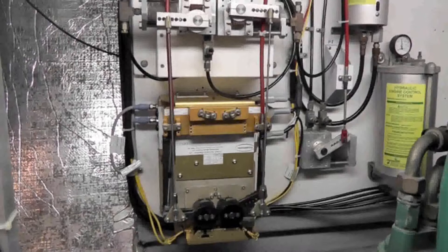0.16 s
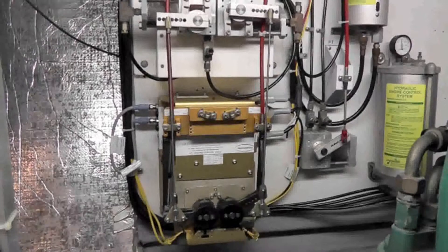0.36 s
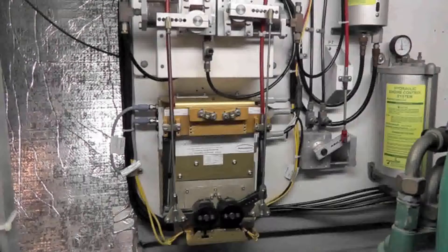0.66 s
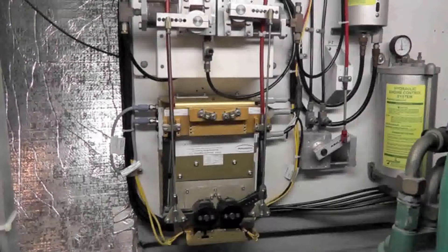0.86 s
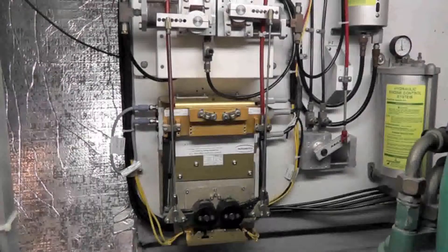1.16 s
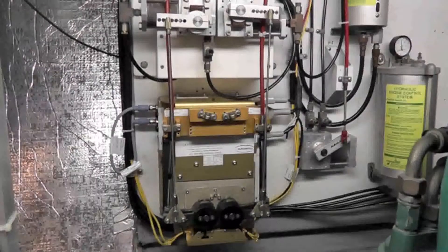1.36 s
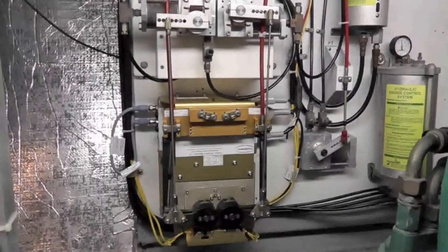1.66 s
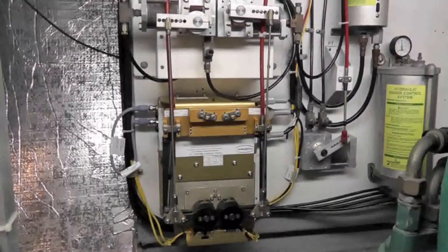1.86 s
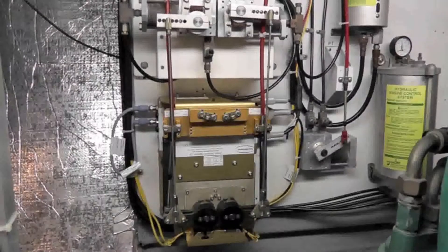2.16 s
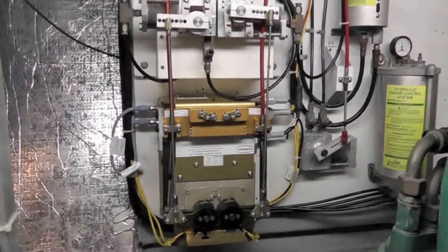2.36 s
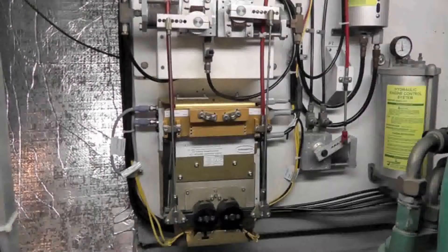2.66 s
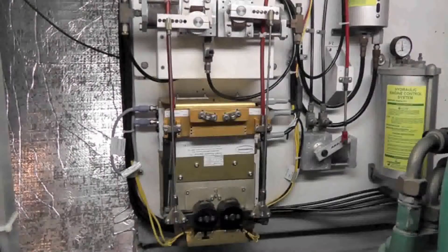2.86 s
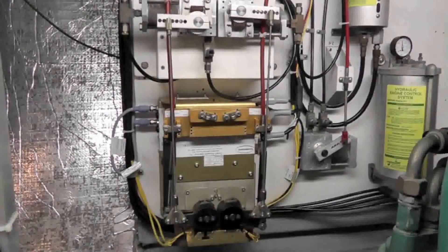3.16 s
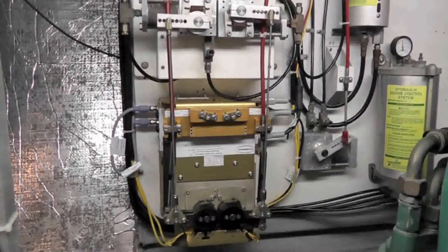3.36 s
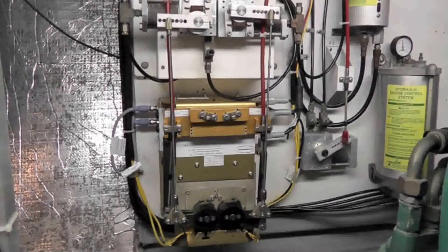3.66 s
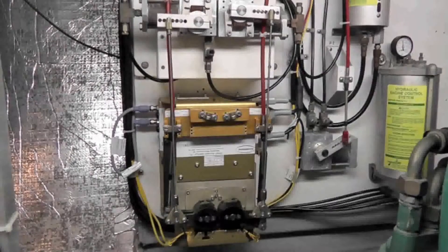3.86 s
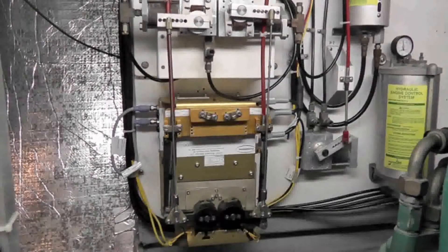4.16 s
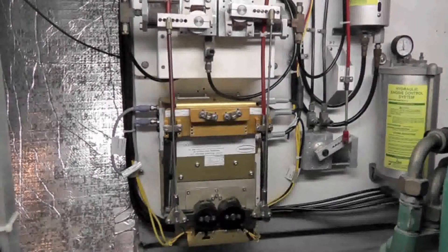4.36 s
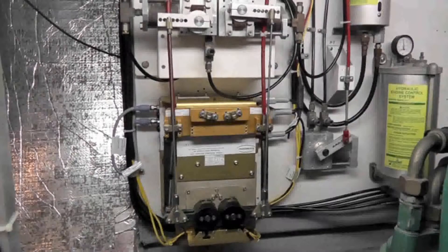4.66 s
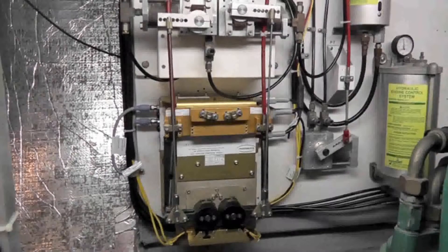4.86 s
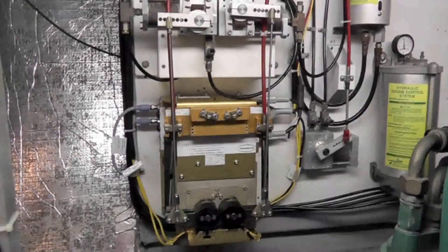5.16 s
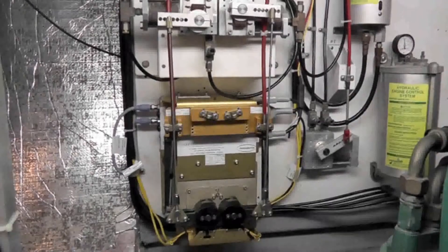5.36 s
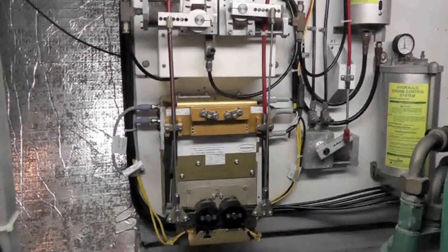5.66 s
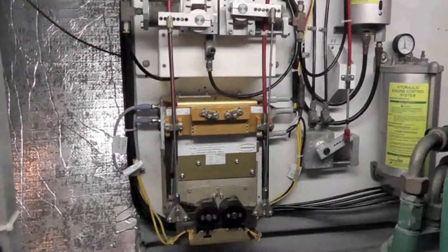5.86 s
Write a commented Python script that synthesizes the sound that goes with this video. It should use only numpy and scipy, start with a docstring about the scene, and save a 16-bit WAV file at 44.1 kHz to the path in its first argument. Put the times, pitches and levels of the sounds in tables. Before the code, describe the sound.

Small electric actuators push shift cables in a boat engine room. One stroke winds down at the start, then four more follow about a second and a half apart. Each is a short gear whine that rises and falls, with grinding teeth and a bright hiss. Linkage clicks and dull bumps come in and between the strokes. The microphone is close, in a padded room with a faint hum and low rumble.

```python
"""Geared electric actuators on a bulkhead push shift cables in short strokes, a metre from a small camera. On
each stroke the gear whine glides up and down through the ringing housing, over grinding teeth and brush hiss.
Ticks, dull bumps and a faint rubbing fall in and between the strokes. The engine room is close and padded, with
mains hum, two faint machinery tones and a low hull rumble."""
import sys
import numpy as np
from scipy import signal
from scipy.fft import rfft, irfft, next_fast_len
from scipy.io import wavfile
from scipy.ndimage import uniform_filter1d

SR = 44100
rng = np.random.default_rng(int(sys.argv[2]) if len(sys.argv) > 2 else 0)


def unload_audio(sound):
    """Save the sound as a 16-bit wav file, at the path given as the first command line argument."""
    columns = np.transpose(np.atleast_2d(sound))
    # keep every value between -1 and 1, then stretch to whole-number steps
    steps = np.round(np.clip(columns, -1, 1) * 32767)
    wavfile.write(sys.argv[1], SR, steps.astype(np.int16))


N = 264600
T = np.arange(N) / SR
SIZE = next_fast_len(N + SR)
F = np.arange(SIZE // 2 + 1) * SR / SIZE
LEFT_RIGHT = np.array([[1], [-1]])


def actuators(drive_db=20, air_db=-56):
    """Whine, grinding and knocks shake the housing; brushes and lead screw hiss above it."""
    # Motor runs, the first already slowing, the last a second actuator joining in: on/s, spin-up/s,
    # top mesh rate/Hz, brake/s, slow-down/s, off/s, halt/s, high and low coasting fade/(dB/s),
    # high and low grinding/dB, hiss/dB, whine/dB, overtones/dB
    runs = [(-1, .065, 1700, -.47, .5, 0.0, .45, 115, 52, -22, -24.5, -38, -41, 3),
            (.935, .065, 1700, 1.167, .29, 1.545, 1.655, 230, 130, -28, -28.5, -45, -46, 4),
            (2.54, .065, 1700, 2.822, .27, 3.13, 3.245, 170, 110, -26.5, -26.5, -44, -46, 3.5),
            (4.08, .065, 1720, 4.341, .25, 4.65, 4.79, 115, 60, -23.5, -27, -42, -47, -5),
            (5.546, .058, 1760, 5.78, .6, 6.5, 6.6, 200, 100, -24.5, -30, -40, -46, 14),
            (5.72, .065, 1710, 6.2, .27, 6.5, 6.6, 200, 100, -33, -34, -53, -46, 3)]
    # Tight spots of the slow gear: t/s, width/s, grinding swell/dB, hiss swell/dB, whine surge/dB
    tight_spots = [(.002, .01, 6, 1, 8), (.028, .012, 7, 1, 5), (.055, .012, 2.5, 4, 1),
                   (.125, .012, 4, 1, 4), (.969, .014, 1, 3, 16), (1.003, .012, 4, 5, 12),
                   (1.022, .012, 1, 1, 10), (1.082, .018, 3, 1, 21), (1.14, .012, 5, 2.5, 13),
                   (1.207, .017, 5, 3, 17), (1.27, .018, 6, 7, 16), (1.377, .018, 4, 1, 21),
                   (1.443, .01, 1, 7, 1), (1.51, .012, 7, 7, 5), (1.552, .009, 7, 3, 5),
                   (1.64, .018, 5, 1, 1), (2.579, .014, 1, 1, 19), (2.61, .012, 2.5, 1, 14),
                   (2.632, .012, 2.5, 1, 11), (2.688, .015, 4, 2.5, 19), (2.75, .012, 3, 5, 6),
                   (2.82, .016, 4, 2.5, 16), (2.878, .014, 5, 5, 16), (2.953, .014, 2.5, 1, 21),
                   (3.022, .012, 1, 1, 9), (3.052, .011, 5, 1, 14), (3.076, .01, 6, 1, 14),
                   (3.14, .016, 2.5, 5, 3), (3.232, .018, 5, 1, 1), (4.108, .016, 2.5, 1, 13),
                   (4.142, .011, 4, 0, 19), (4.225, .022, 3, 1, 21), (4.272, .016, 5, 4, 13),
                   (4.332, .014, 6, 2.5, 20), (4.405, .014, 6, 3, 21), (4.47, .015, 4, 5, 24),
                   (4.535, .015, 3.5, 1, 5), (4.592, .018, 4, 2.5, 15), (4.647, .01, 7, 1, 5),
                   (4.745, .014, 6, 1, 3), (5.572, .014, 1, 1, 16), (5.64, .025, 2.5, 1, 13),
                   (5.76, .012, 2.5, 1, 9), (5.788, .014, 0, 0, 14), (5.86, .016, 3.5, 1, 12),
                   (5.908, .014, 5, 4, 14), (5.975, .018, 5, 1.5, 8)]
    swells = np.array([np.exp(-.5 * ((T - s) / width) ** 2) for s, width, *_ in tight_spots])
    grind_swell, hiss_swell, surge = np.array(tight_spots)[:, 2:].T @ swells
    next_starts = [run[0] for run in runs[1:]] + [N / SR]
    high_power = low_power = hiss_power = tone = 0
    for run, next_on in zip(runs, next_starts):
        on, spin, top_hz, brake, slow, off, halt, high_fade, low_fade = run[:9]
        high_db, low_db, hiss_db, whine_db, overtones_db = run[9:]
        mesh_hz, octaves = motion(on, spin, top_hz, brake, slow)
        high_shape = envelope(on + .032, off, halt, high_fade)
        low_shape = envelope(on + .012, off, halt, low_fade)
        hiss_shape = envelope(on + .045, off, halt, high_fade, rise_db_s=520)
        # Slower gears strike more softly: each octave of braking costs the highs more dB than the lows.
        high_power += undb(high_db + 7 * octaves + high_shape) ** 2
        low_power += undb(low_db + 2.1 * octaves + low_shape) ** 2
        hiss_power += undb(hiss_db + 8.5 * octaves + hiss_shape) ** 2
        tone_db = whine_db + 2.5 * octaves + low_shape + surge * (T < next_on)  # the newest run surges
        tone += whine(mesh_hz, tone_db, overtones_db + 7 * np.log2(mesh_hz / top_hz))
    force = (grinding(high_power, low_power, grind_swell) + tone + knocks()) * undb(drive_db)
    force += undb(air_db) * rng.standard_normal(N)  # air noise keeps the housing faintly ringing
    return housing(force) + overtones_and_drone(force) + brush_hiss(hiss_power, hiss_swell)


def motion(on, spin, top_hz, brake, slow, creep_hz=640, knee=6.0):
    """Mesh rate and braking in octaves: the motor creeps, spins up, then slows ever more gently."""
    up = 1 - np.exp(-np.maximum(T - on, 0) / spin)
    down = (1 + np.exp(np.minimum(knee * (T - brake) / slow, 99.))) ** (-1 / knee)
    return top_hz * down * np.maximum(up, creep_hz / top_hz), np.log2(down)


def envelope(full, off, halt, fade_db_s, rise_db_s=480, halt_db_s=700):
    """Level in dB: rises until full, fades while coasting, drops at the halt."""
    attack = -rise_db_s * np.maximum(full - T, 0)
    return attack - fade_db_s * np.maximum(T - off, 0) - halt_db_s * np.maximum(T - halt, 0)


def whine(mesh_hz, db, overtones_db, teeth=10., beat=.75, wobble_db=2.5, jitter=.024):
    """Tooth mesh tone, wavering and beating once a turn of the pinion."""
    # Partials: multiple of the mesh rate, level/dB
    partials = [(1, 0.5), (2, -12), (3, -24)]
    phase = 2 * np.pi * np.cumsum(mesh_hz * (1 + jitter * walk(220))) / SR
    tone = sum(undb(level + (k > 1) * overtones_db + wobble_db * walk(110)) * np.sin(k * phase)
               for k, level in partials)
    return undb(db) * tone * (1 + beat * np.sin(phase / teeth))


def grinding(high_power, low_power, swell_db, crossover_hz=1750):
    """Rough tooth flanks scrape, with separate envelopes for highs and lows."""
    rough = grit(1.9) * undb(1.64 * walk(120))
    low = through(rough, 1 / (1 + (F / crossover_hz) ** 8))
    return ((rough - low) * np.sqrt(high_power) + low * np.sqrt(low_power)) * undb(swell_db)


def knocks(contact_s=.0011):
    """Short blows on the housing as the gears take up slack."""
    # Blows: t/s, level before the drive gain/dB
    blows = [(0.607, -41), (.678, -48), (0.89, -37.5), (0.92, -26), (2.517, -34), (4.046, -29),
             (4.074, -26), (5.51, -25.5)]
    force, pulse = np.zeros(N), np.hanning(int(contact_s * SR))
    for s, db in blows:
        force[int(s * SR):][:len(pulse)] += pulse * undb(db)
    return force


def housing(force):
    """Housing and mounting plate ring in stereo; neighbouring modes alternate in sign."""
    # Modes: f/Hz, width/Hz, gain/dB, left minus right/dB
    modes = [(125, 160, -27, -5), (245, 66, -24, -3), (354.6, 38, -19.5, -7.5), (490.7, 34.6, -5.5, -1),
             (579.2, 35.2, -2.5, -1.5), (620, 30, -5, -0.5), (666, 26, 2.5, 0.5), (753, 18.8, 2, 1.5),
             (814.8, 22.8, 1, -0.5), (888, 32, -6.5, 2.5), (1016, 36, -3, -2.5), (1141.3, 41, -0.5, -0.5),
             (1284.3, 48, -7.5, -1), (1558, 69.5, -15.5, -3.5), (1960, 54, -10, 4), (2040, 55, -8, -1),
             (2142, 65, -6.5, 1), (2498, 64, -15.5, 2.5), (2637, 84, -12, 0.5), (2773, 130, -11.5, -2),
             (2863, 44, -9, -2), (3153, 110, -13.5, 0.5), (3340, 99, -11, 0), (3632, 100, -12, 1.5),
             (3874, 100, -16, 0), (4174, 390, -26.5, -3.5)]
    response = sum((-1) ** k * undb(db + LEFT_RIGHT * pan_db / 2) * resonance(hz, width)
                   for k, (hz, width, db, pan_db) in enumerate(modes))
    return through(force, response)


def overtones_and_drone(force):
    """Brief bright bands at the gear whine's overtones, and a low 362 Hz drone during some strokes."""
    # Bands: start/s, end/s, f/Hz, width/Hz, gain/dB
    bands = [(.96, 1.02, 3500, 110, -4.5), (.99, 1.03, 2480, 98, -4), (2.6, 2.65, 2600, 200, -10),
             (2.7, 3.3, 362, 23, -16), (2.87, 2.9, 2750, 130, -3), (4.1, 4.5, 2680, 150, -15),
             (5.58, 5.72, 2900, 90, -4), (5.6, 6.1, 362, 23, -18)]
    out = 0
    for start, end, hz, width, db in bands:
        gate = np.interp(T, [start - .02, start, end, end + .042], [0, 1, 1, 0])
        out += undb(db) * through(force * gate, resonance(hz, width))
    return out


def brush_hiss(power, swell_db):
    """Bright, fluttering friction of the brushes and lead screw."""
    # Hiss EQ: f/Hz, relative level/dB
    eq = [(2820, -40.5), (4800, 0), (6150, 1.5), (7590, -1.5), (8970, 1.5), (9850, 11.5), (10400, 2.5),
          (10700, -32.5), (13900, -42), (22000, -120)]
    return unit(through(grit(2.8), colour(eq))) * np.sqrt(power) * undb(swell_db + 2.0 * walk(70))


def ticks():
    """Ticks and clacks: noise bursts with a sharp snap and a short tail."""
    # Ticks: t/s, level before filtering/dB, f/Hz, width/Hz, t60/s
    hits = [(.607, -54, 2500, 3000, .06), (0.6804, -44, 4500, 9000, 0.087), (0.715, -47, 4500, 5000, .03),
            (2.3515, -39, 8000, 8000, 0.057), (3.822, -41.5, 2000, 3000, 0.032),
            (3.834, -45, 8000, 10200, 0.062), (3.934, -55.5, 5040, 5000, .03),
            (5.099, -47, 8000, 10000, .03), (5.2845, -42, 2790, 3000, .03), (5.456, -29, 3530, 4330, 0.098),
            (.888, -48, 4000, 7000, .05), (0.94, -31, 6000, 8000, .06), (1.012, -25.5, 4500, 5000, .05),
            (2.619, -32.5, 5950, 6000, .04), (2.868, -24.5, 3920, 4050, 0.072),
            (4.046, -35, 2400, 2600, .07), (4.097, -38, 7060, 7000, .04), (4.397, -23, 4960, 6000, 0.11),
            (4.579, -40, 5000, 6000, 0.054), (5.51, -36, 2600, 2600, .08), (5.72, -16, 6400, 4000, .05),
            (5.906, -33, 6030, 6000, 0.043)]
    out, t = np.zeros(N), np.arange(4096) / SR
    for s, db, hz, width, t60 in hits:
        burst = rng.standard_normal(len(t)) * (np.exp(-t / 0.002) + 0.45 * 1000 ** (-t / t60))
        edges_hz = [max(hz - width / 2, 500), min(hz + width / 2, 14000.)]
        band = signal.butter(2, edges_hz, "band", fs=SR, output="sos")
        out[int(s * SR):][:len(t)] += undb(db) * signal.sosfilt(band, burst)
    return out


def thuds():
    """Dull bumps through the bulkhead: damped low rings with a soft attack."""
    # Bumps: t/s, level/dB, f/Hz, t60/s
    bumps = [(0.929, -29, 248.7, .15), (0.952, -32, 147, 0.17), (2.56, -40, 245, .15),
             (1.002, -40, 70, 0.18), (2.6, -42, 107, 0.14), (2.88, -40.5, 57.7, .15),
             (4.11, -42.5, 160, .15), (4.249, -38.5, 94, 0.49), (5.004, -36.5, 305, 0.094),
             (5.13, -51.5, 602, 0.14), (5.592, -31.5, 146.5, 0.18)]
    out, t = np.zeros(N), np.arange(SR // 4) / SR
    attack = 1 - np.exp(-t / 0.003)
    for s, db, hz, t60 in bumps:
        out[int(s * SR):][:len(t)] += undb(db) * attack * 1000 ** (-t / t60) * np.sin(2 * np.pi * hz * t)
    return out


def rubbing():
    """Soft grit, perhaps a cable creeping in its sheath, loudest before the last stroke."""
    # Friction bands: f/Hz, width/Hz, relative level/dB
    bands = [(750, 600, 4), (1490, 200, -10.5), (2230, 90, 4), (2750, 90, -4), (5000, 240, -13),
             (6500, 1500, -24)]
    # Rubbing fader: t/s, level/dB
    fader = [(0, -74), (.9, -78), (1.7, -71), (2.5, -70), (3.26, -61), (3.6, -76), (4.75, -71), (4.88, -61),
             (5.06, -75), (5.2, -64), (5.3, -56), (5.5, -56.5), (6, -74)]
    eq = sum(undb(db) * resonance(hz, width) for hz, width, db in bands)
    return unit(through(grit(1.5), eq)) * undb(np.interp(T, *np.transpose(fader)) + 1.5 * walk(30))


def walls(x, t60_s=.16, mid_db=-13):
    """Short diffuse echoes off the padded walls, different left and right."""
    # Side EQ of the echoes: f/Hz, gain/dB
    side_eq = [(60, -1.5), (110, -4.5), (190, -4.5), (330, -2.5), (590, -11), (1040, -8), (1840, -4),
               (3260, -13.5), (5770, -47.5), (10200, -5)]
    t = np.arange(int(t60_s * SR)) / SR
    tails = rng.standard_normal((2, SR))[:, :len(t)] * 1000 ** (-t / t60_s) * (t > .002)
    mid, side = rfft(tails / np.sqrt(np.sum(tails ** 2, axis=1, keepdims=True)), SIZE)
    mono = x.mean(axis=0)
    return through(mono, undb(mid_db) * mid) + LEFT_RIGHT * through(mono, side * colour(side_eq))


def room_tone(level_db=-52.5):
    """The engine room's bed of dark noise and faint hiss, gently wavering."""
    # Room tone EQ: f/Hz, relative level/dB
    eq = [(12, -61), (20, -26.5), (71, -8.5), (123, -4), (207, -9), (243, -2), (263, -10), (360, -17.5),
          (625, -20), (732, -22.5), (1210, -31.5), (2210, -37.5), (4370, -39.5), (7190, -37.5),
          (10700, -41.5), (13900, -74), (22000, -120)]
    # Stereo width: f/Hz, side minus mid/dB
    side_eq = [(60, -21), (110, -14), (190, -12), (330, -0.5), (590, -2), (1040, 1.5), (1840, -3.5),
               (3260, -11), (5770, -15), (10200, -14)]
    mid, side = through(rng.standard_normal((2, N)), colour(eq))
    gain = undb(level_db + walk(4.4)) / np.std(mid)
    return gain * (mid + LEFT_RIGHT * through(side, colour(side_eq)))


def hum_and_machinery():
    """Mains hum, plus two faint high steady machinery tones; each drifts a little in level and phase."""
    # Tones: f/Hz, rms level/dB
    tones = [(120, -62), (241, -60.5), (361, -67), (481, -72.5), (721, -68), (802, -74), (2256, -84.5),
             (2751, -85)]
    return sum(np.sqrt(2) * undb(db + 2.0 * walk(5.5)) * np.sin(2 * np.pi * (hz * T + 0.05 * walk(8.8)))
               for hz, db in tones)


def rumble(centre_hz=90, width_hz=63):
    """A low drone from the hull that comes and goes, not quite alike left and right."""
    # Rumble fader: t/s, level/dB
    fader = [(0.0, -51), (1.1, -49), (2.1, -59), (2.8, -55), (3.3, -61), (4.3, -56), (4.7, -62), (5.0, -55),
             (6.0, -56)]
    mid, side = through(rng.standard_normal((2, N)), resonance(centre_hz, width_hz) ** 2)
    return (mid + .4 * side * LEFT_RIGHT) / np.std(mid) * undb(np.interp(T, *np.transpose(fader)))


def grit(scatter_db):
    """Dense uneven impacts between rough surfaces."""
    return unit(rng.standard_normal(N) * undb(scatter_db * rng.exponential(size=N)))


def walk(rate):
    """Random levels held 1 / rate s and slewed twice; spread near 1."""
    k = int(SR / rate)
    steps = np.repeat(rng.standard_normal(N // k + 1), k)
    return 1.259 * uniform_filter1d(uniform_filter1d(steps, k), k)[:N]


def resonance(hz, width):
    """Second-order band-pass, gain 1 at the centre."""
    return 1j * F * width / (hz ** 2 - F ** 2 + 1j * F * width)


def colour(points):
    """Gain at every frequency from (f/Hz, level/dB) points."""
    hz, db = np.transpose(points)
    return undb(np.interp(np.log(F + 1), np.log(hz + 1), db))


def through(x, response):
    return irfft(rfft(x, SIZE) * response, SIZE)[..., :N]


def undb(db):
    return 10 ** (np.asarray(db) / 20)


def unit(x):
    return x / np.sqrt(np.mean(x ** 2))


def scene():
    """The close machinery and its echoes over the engine room's background."""
    near = actuators() + ticks() + thuds() + rubbing()
    return near + walls(near) + room_tone() + hum_and_machinery() + rumble()


def record(dry):
    """The camera rounds the loudest peaks and cuts the top steeply."""
    ceiling, top_hz = 1.1, 10520
    high_cut = signal.ellip(12, .3, 75, top_hz, fs=SR, output="sos")
    return signal.sosfilt(high_cut, ceiling * np.tanh(dry / ceiling))


dry = scene()
out = record(dry)
unload_audio(out)
```